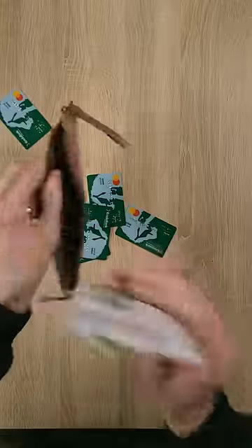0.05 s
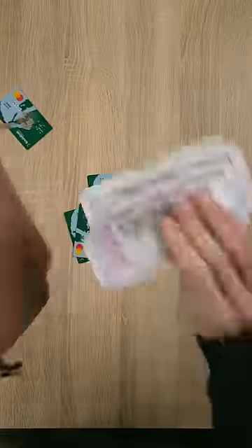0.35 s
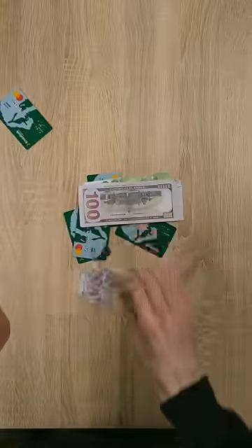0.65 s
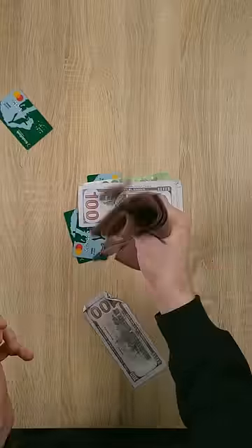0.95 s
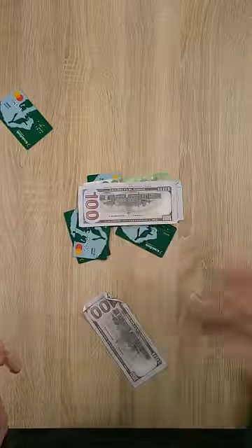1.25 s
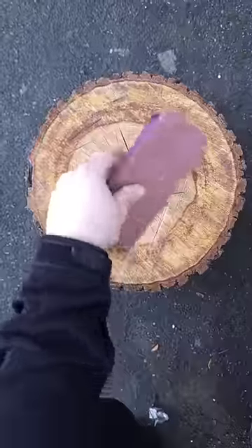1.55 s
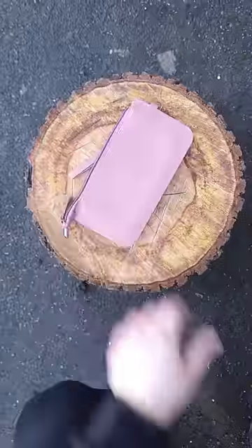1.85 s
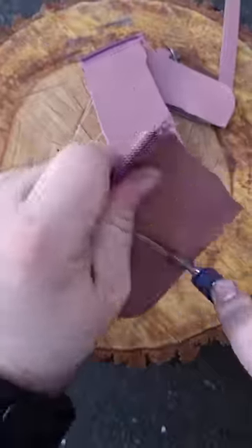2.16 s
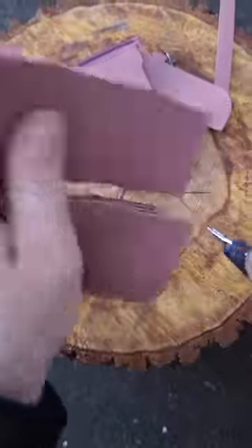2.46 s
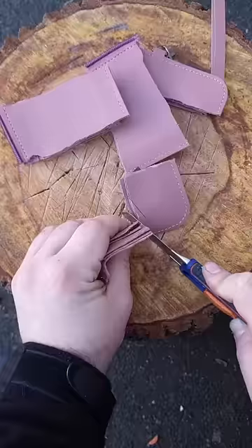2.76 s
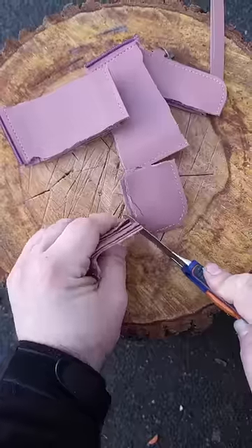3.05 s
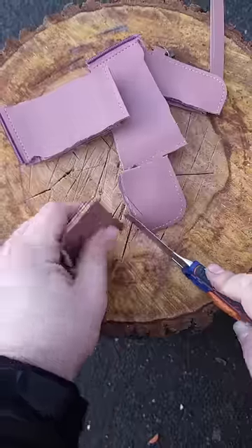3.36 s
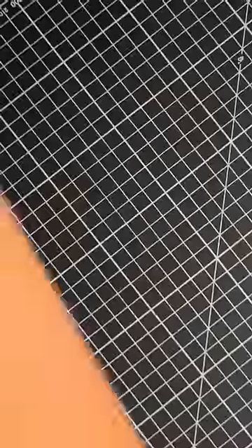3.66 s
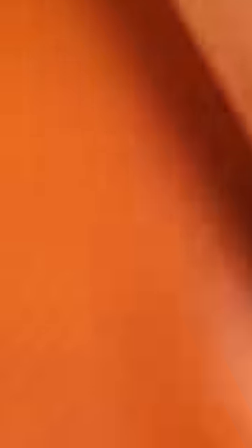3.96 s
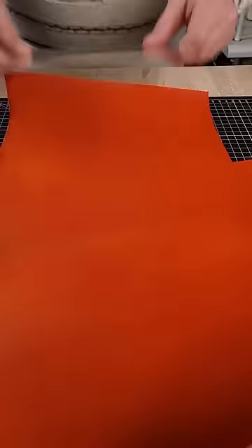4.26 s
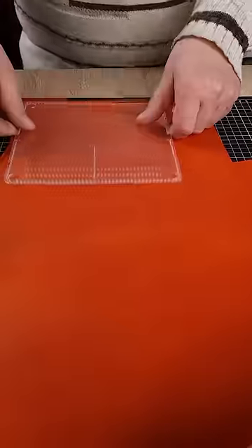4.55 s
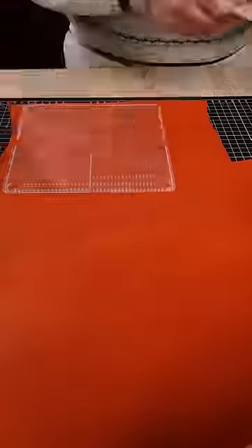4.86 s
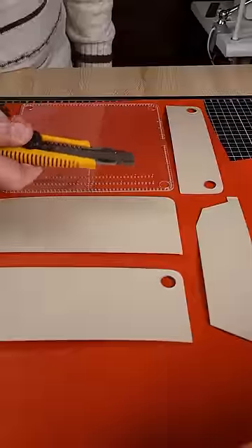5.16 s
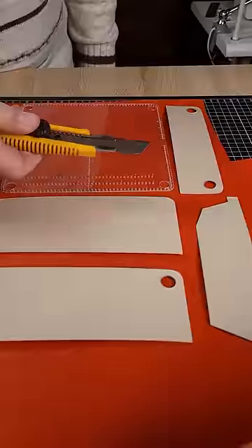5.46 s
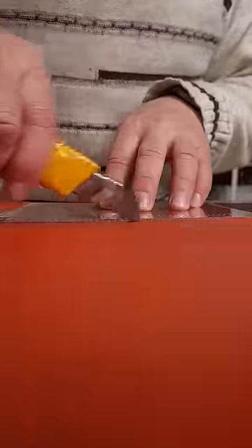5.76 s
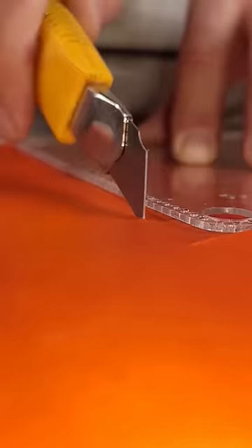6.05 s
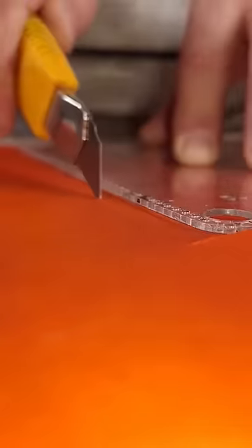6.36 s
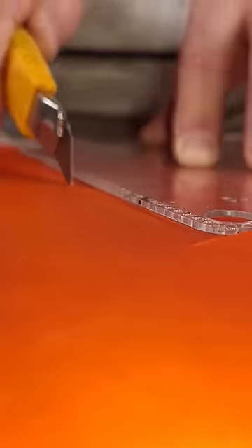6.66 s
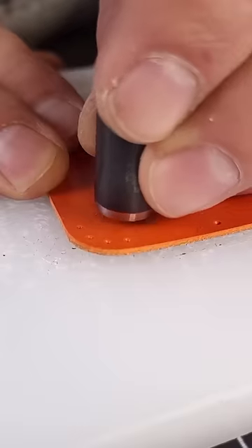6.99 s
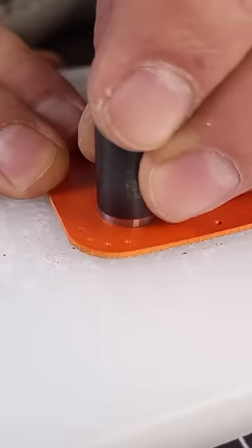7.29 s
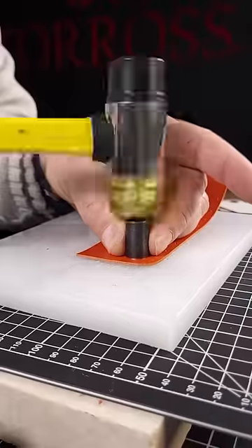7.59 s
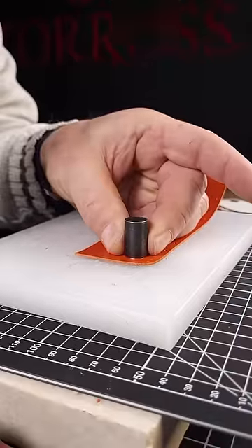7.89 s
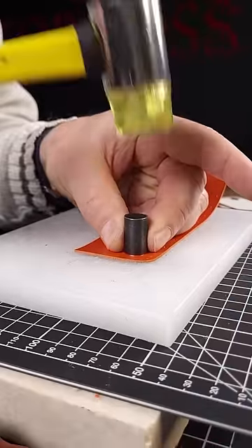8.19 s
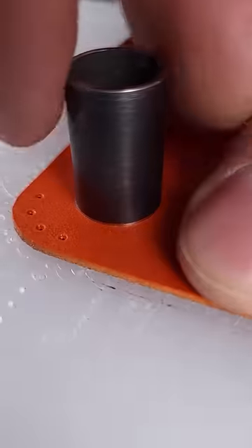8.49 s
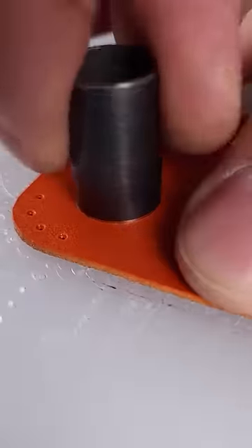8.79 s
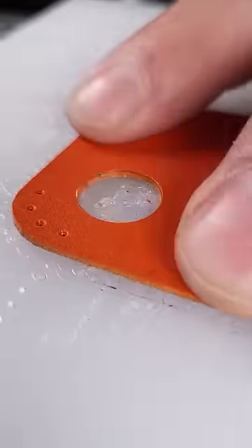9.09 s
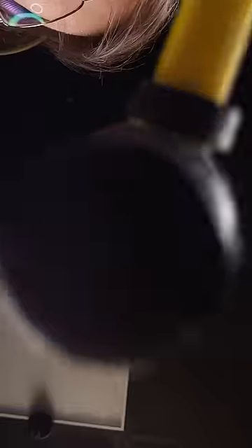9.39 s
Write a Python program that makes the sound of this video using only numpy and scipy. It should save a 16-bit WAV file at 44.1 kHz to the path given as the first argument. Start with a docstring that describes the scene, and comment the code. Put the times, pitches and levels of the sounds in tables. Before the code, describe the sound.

Money lands on a table, then leather is snipped, flopped open, sliced with a utility knife and punched with two loud, booming mallet blows.

```python
"""Leather work in quick shots, each place with its own background. A wallet is emptied on a table.
Outdoors, scissors shear a leather patch on a stump. In the shop a hide swishes and slaps open,
a plastic template lands on it, and a snap-off knife ratchets out and slices along the template.
A mallet drives a hole punch twice, booming through bench and room and overloading the microphone.
The punch is worked loose; a dry knock close by ends the scene."""
import sys
import numpy as np
from scipy import signal
from scipy.io import wavfile
from scipy.ndimage import uniform_filter1d

SR = 44100
rng = np.random.default_rng(int(sys.argv[2]) if len(sys.argv) > 2 else 0)


def materialize(psi):
    """Save the field psi as 16-bit PCM at rate SR to the path in sys.argv[1].

    A 1-D psi becomes a single channel; in a 2-D psi each row is a channel.
    """
    bounded = np.clip(np.atleast_2d(psi).T, -1, 1)
    quanta = np.round(bounded * 32767).astype(np.int16)
    wavfile.write(sys.argv[1], SR, quanta)


N = 424683
TIME = np.arange(N) / SR
SWING_START_S = 3.465

# flexing hide: freq_hz, level_db
LEATHER_SPECTRUM = [(60, -22), (200, -11.5), (420, -8), (1400, -6), (3100, -9.5), (4300, -16.5),
                    (10000, -26.5), (16000, -37)]
# workshop reverberation: freq_hz, t60_s
SHOP_DECAY = [(60, 0.49), (200, 0.3), (700, 0.1), (7000, 0.3), (15000, 0.21)]


def amp(db):
    """Decibels to gain."""
    return 10 ** (np.asarray(db) / 20)


def read(points, hz):
    """Interpolates a table along log frequency."""
    freq_hz, value = np.transpose(points)
    return np.interp(np.log(hz + 1), np.log(freq_hz + 1), value)


def add(mix, start_s, sound):
    """Mixes a sound in at start_s."""
    part = mix[:, round(start_s * SR):][:, :sound.shape[-1]]
    part += sound[..., :part.shape[1]]


def spread(mid, side, width=.3, pan_db=0):
    """Left and right from a shared and an unshared part."""
    return np.array([mid + width * side, mid - width * side]) * amp([[pan_db / 2], [-pan_db / 2]])


def centre_bass(x, below_hz):
    """Long waves reach both microphones almost alike; short ones differ."""
    side = (x[0] - x[1]) / 2
    treble = signal.lfilter(*signal.butter(1, below_hz, "high", fs=SR), side)
    return spread(x.mean(0), .25 * side + .75 * treble, width=1)


def body(spectrum, modes=(), tilt_db_oct=0, ripple_db=0):
    """Unit-energy response: a tilted spectrum, strong resonances and a ripple of many weak ones."""
    hz = abs(np.fft.fftfreq(4096, 1 / SR))
    db = read(spectrum, hz) + tilt_db_oct * np.log2(np.maximum(hz, 250) / 1000)
    weak_hz = np.arange(0, SR, 70)
    db += ripple_db * np.interp(hz, weak_hz, rng.uniform(-1.02, 1, len(weak_hz)))
    for centre_hz, width_hz, lift_db in modes:
        db += lift_db * np.exp2(-(2 * (hz - centre_hz) / width_hz) ** 2)
    minimum_phase = np.exp(np.conj(signal.hilbert(np.log(amp(db)))))
    response = np.fft.ifft(minimum_phase).real[:len(hz) // 2]
    return response / np.linalg.norm(response)


def level(curve):
    """Smoothed gain along (time_s, level_db) points, silent outside them."""
    time_s, db = np.transpose(curve)
    inside = (TIME >= time_s[0]) & (TIME <= time_s[-1])
    return uniform_filter1d(amp(np.interp(TIME, time_s, db)) * inside, size=128)


def swell(start_s, length_s, level_db):
    """Level curve of one stroke: rise, hold, fade."""
    shape = [(-1 / 4, -24), (1 / 5, -2), (2 / 3, 0), (5 / 4, -24)]
    return [(start_s + share * length_s, level_db + dip_db) for share, dip_db in shape]


def rush(curve, spectrum, modes=(), grain_db=0, grain_s=.0048, width=.1, pan_db=0, ripple_db=0):
    """Countless tiny impulses ring a body, in clumps when surfaces stick and slip."""
    gain = level(curve)
    live = np.flatnonzero(gain > 1e-9)
    white = rng.standard_normal((2, len(live)))
    knots_s = np.arange(0, 10, grain_s)
    grip = np.clip(rng.standard_normal(20000)[:len(knots_s)], -2, 2)
    clumps = amp(grain_db * np.interp(TIME[live], knots_s, grip))
    clumps /= np.sqrt(np.mean(clumps ** 2) + 1e-20)
    response = body(spectrum, modes, ripple_db=ripple_db)
    sound = signal.oaconvolve(white * clumps, response[None], axes=1)[:, :len(live)]
    out = np.zeros((2, N))
    out[:, live] = spread(*sound, width, pan_db) * gain[live]
    return out


def hits(rows, spectrum, modes=(), rise_s=.0004, width=.13, pan_db=0, wander=.041, lead_in=0):
    """Each contact is a fast-dying chatter ringing a body whose resonances shift with the grip."""
    lead_in_s = .004  # a faint swell of noise leads into the click, softening its onset
    t = TIME[:SR // 4] - 2 * lead_in_s
    after_s = np.maximum(t, 0)
    out = np.zeros((2, N))
    for start_s, db, t60_s, tilt_db_oct in rows:
        shift = 1 + wander * rng.uniform(-1.1, 1)
        shifted = [(hz * shift, width_hz, lift_db) for hz, width_hz, lift_db in modes]
        response = body(spectrum, shifted, tilt_db_oct)
        envelope = amp(-60 * after_s / t60_s) * (1 - np.exp(-after_s / rise_s))
        envelope += lead_in * np.exp(-abs(t) / lead_in_s)
        burst = rng.standard_normal((2, len(t))) * envelope
        chatter = signal.fftconvolve(burst, response[None], axes=1)
        chatter *= np.linalg.norm(envelope) / np.linalg.norm(chatter, axis=1, keepdims=True)
        add(out, start_s + t[0], amp(db) * spread(*chatter, width, pan_db))
    return out


def alike(rows, t60_s, tilt_db_oct=0, gain_db=0):
    """Gives contacts of one kind a common decay, tilt and gain."""
    return [(start_s, db + gain_db, t60_s, tilt_db_oct) for start_s, db in rows]


def ringing(modes, rise_s, scatter=1):
    """Dying modes build up as a blow spreads; scatter=0 starts them in phase."""
    t = TIME[:SR]
    waves = sum(amp(db - 60 * t / t60_s) * np.sin(2 * np.pi * (hz * t + scatter * rng.random()))
                for hz, db, t60_s in modes)
    return waves * (1 - np.exp(-t / rise_s))


def tail(decay):
    """Two unrelated wakes of dense reflections, each band dying at its own rate."""
    hz, t, bands = signal.stft(rng.standard_normal((2, SR * 3 // 4)), SR, nperseg=256)
    return signal.istft(bands * amp(-60 * t / read(decay, hz)[:, None]), SR, nperseg=256)[1]


def room(x, decay, wet_db, width=.13):
    """Adds the reflections of the surroundings."""
    response = spread(*tail(decay), width)
    response /= np.linalg.norm(response[0])
    return x + amp(wet_db) * signal.oaconvolve(x.mean(0)[None], response, axes=1)[:, :N]


def backgrounds():
    """Room air and mains hum indoors, a low rumble in the yard."""
    # air of each place: freq_hz, level_db
    table_air = [(100, -5.5), (300, -14), (580, -7.5), (1300, -27), (4000, -28.5), (7000, -26),
                 (15000, -29.5)]
    yard_air = [(25, -15.5), (75, 1.5), (202, -5), (293, -2.5), (790, -16), (4380, -31.5), (15000, -47)]
    shop_air = [(30, 0), (122, -16), (154, -9.5), (472, -4.5), (552, -12), (716, -4.5), (1140, -17),
                (15000, -43)]
    # its level curves: time_s, level_db
    table_curve = [(0, -58.5), (.8, -67), (1.38, -64)]
    yard_curve = [(1.38, -51), (1.85, -45), (2.0, -39), (2.75, -40.5), (2.8, -43), (3.48, -45)]
    shop_curves = [
        [(4.09, -56), (4.95, -63), (5.45, -76.5)],
        [(6.68, -61), (7.36, -60)],
        [(8.19, -57), (9.3, -57), (9.32, -81.5), (9.63, -74)],
    ]
    # mains: start_s, end_s, pitch_hz, level_db
    hums = [(0, 1.347, 99, -64), (4.097, 5.24, 119.3, -69), (6.69, 9.32, 118.6, -66)]
    yard = rush(yard_curve, yard_air, grain_db=2, grain_s=.063, width=1, pan_db=-1)
    out = rush(table_curve, table_air, width=.63) + centre_bass(yard, below_hz=760)
    for curve in shop_curves:
        out += rush(curve, shop_air, modes=[(700, 200, 4.6), (1342, 190, 5.3), (6700, 410, 8)], width=.2)
    for start_s, end_s, hz, db in hums:
        phase = 2 * np.pi * hz * TIME
        hum = np.sqrt(2) * (np.sin(phase) + amp(-8) * np.sin(2 * phase))
        out += level([(start_s, db), (end_s, db)]) * hum
    return out


def brushes(rows, grain_db, width):
    """Brief friction over paper or leather."""
    # brushed paper: freq_hz, level_db
    spectrum = [(200, 2.5), (900, -5.5), (1900, 2), (3600, -2.5), (7000, -3), (10000, -13.5),
                (16000, -13.5)]
    return sum(rush(swell(*row), spectrum, grain_db=grain_db, width=width) for row in rows)


def wallet():
    """Banknotes rustle and land among cards; each slap leaves a short wash in the bare room."""
    # paper on palms: start_s, length_s, level_db
    rustles = [(0, 0.42, -62), (.88, 0.1, -59), (1.02, 0.097, -55), (1.172, 0.025, -60)]
    # cards and money landing: start_s, level_db, t60_s, tilt_db_oct
    drops = [(0.176, -34.5, 0.012, 2), (0.403, -12, 0.026, 0.5), (.884, -24, 0.015, 2.5),
             (1.006, -40.5, 0.014, 1)]
    # slap on the table: freq_hz, level_db
    spectrum = [(60, -17.5), (408, -5), (767, -13), (1200, -14.5), (1820, -4.5), (3420, -3.5), (16000, -23)]
    reflections = [(start_s, db - 17.5, .3, tilt - 1.5) for start_s, db, _, tilt in drops]
    wash = hits(reflections, spectrum, rise_s=.0023, width=.89)
    slaps = hits(drops, spectrum, rise_s=.0024, width=.6)
    return centre_bass(slaps + wash + brushes(rustles, grain_db=3, width=.95), below_hz=400)


def scissors():
    """A leather patch lands on the stump; blades shear its fibres, snap through and tick when moved."""
    # patch: start_s, level_db, t60_s, tilt_db_oct
    landing = [(1.6455, -21.5, 0.034, -1.5)]
    # blade snaps and ticks: start_s, level_db
    snaps = [(1.44, -53), (2.25, -13), (2.3019, -26), (2.317, -25.5), (2.3345, -17.5), (2.3638, -21),
             (2.3807, -15.5), (2.779, -40), (2.878, -38), (2.984, -34.5), (3.072, -21), (3.3802, -20),
             (3.392, -20), (3.4682, -31.5)]
    # blades shearing: start_s, length_s, level_db
    closings = [(2.201, 0.034, -33), (2.426, 0.022, -33.5), (3.056, .018, -36.5), (3.289, .07, -46)]
    # snip: freq_hz, level_db
    spectrum = [(150, -13), (1300, -9.5), (2000, -4.5), (4800, -3), (7500, -2.5), (9000, -10.5),
                (16000, -13.5)]
    # blade resonances: centre_hz, width_hz, lift_db
    modes = [(2025, 300, 9), (2950, 490, 6.5), (4530, 370, 4.5)]
    snips = hits(alike(snaps, t60_s=.023), spectrum, modes, width=.8, pan_db=-5, wander=.13)
    shears = sum(rush(swell(*row), spectrum, modes, grain_db=8, grain_s=.0005, width=.8, pan_db=-2.5)
                 for row in closings)
    patch = hits(landing, LEATHER_SPECTRUM, rise_s=.00097, lead_in=.31)
    return room(patch + snips + shears, decay=[(1000, .1)], wet_db=-9.5)


def hollow(time_s):
    """Resonances of the curved hide, rising as it unrolls."""
    # rolled hide: centre_hz, width_hz, lift_db
    modes = [(435, 120, 12), (820, 190, 9), (1590, 300, 5)]
    rise_per_s = .47
    shift = 1 + rise_per_s * max(time_s - SWING_START_S, 0)
    return [(hz * shift, width_hz, lift_db) for hz, width_hz, lift_db in modes]


def hide():
    """Stiff leather swishes, drags, flops and slaps open; hands and template slide over it."""
    # leather dragging on the mat, hands and template sliding: start_s, length_s, level_db
    drags = [(3.525, 0.068, -23.5), (3.878, .04, -19.5), (4.106, .05, -41.5), (4.316, .04, -41),
             (4.756, .03, -42.5)]
    slides = [(1.93, 0.13, -49), (4.1, 0.065, -44), (4.22, 0.38, -59), (4.39, 0.061, -51.5),
              (4.635, 0.04, -47)]
    # leather flopping over, pulling taut or slapping down: start_s, level_db
    flops = [(1.592, -36.5), (3.718, -19.5), (4.303, -26)]
    slaps = [(3.730, -8), (3.751, -9.5), (3.764, -12), (3.814, -14.5)]
    # slack leather's dull spectrum: freq_hz, level_db
    slack = [(100, -7), (1700, -6.5), (3600, -23), (16000, -44)]
    swing_s = SWING_START_S + np.cumsum([0, .04, .43, .165])  # rise, hold, fall
    swing = list(zip(swing_s, [-60.5, -34.5, -34.5, -60.5]))
    swish = rush(swing, LEATHER_SPECTRUM, hollow(swing_s.mean()), grain_db=3, grain_s=.01, width=.03)
    dragging = sum(rush(swell(*row), slack, hollow(row[0]), grain_db=2) for row in drags)
    flopping = sum(hits([row], slack, hollow(row[0])) for row in alike(flops, t60_s=.048))
    slapping = sum(hits([row], LEATHER_SPECTRUM, hollow(row[0]), rise_s=.0008, width=.03)
                   for row in alike(slaps, t60_s=.042, tilt_db_oct=-1.13))
    sliding = brushes(slides, grain_db=6.5, width=.1)
    return swish + dragging + sliding + room(flopping + slapping, SHOP_DECAY, wet_db=-10.5, width=.05)


def template():
    """The plastic template lands on the hide, each edge with a click and a thud."""
    # edges: start_s, level_db
    landings = [(4.666, -20.5), (4.687, -24), (4.75, -35)]
    clicks = alike(landings, t60_s=.036, tilt_db_oct=6)
    thuds = alike(landings, t60_s=.13, tilt_db_oct=-6.5, gain_db=-12)
    contacts = hits(clicks + thuds, LEATHER_SPECTRUM, rise_s=.001, width=.061, lead_in=.17)
    return room(contacts, SHOP_DECAY, wet_db=-15.5)


def knife_ratchet():
    """The slider scrapes along its channel and slows, clicking at every detent."""
    # clicks: start_s, level_db
    detents = [(4.977, -9.5), (4.985, -14.5), (4.997, -17), (5.009, -12), (5.024, -11.5), (5.034, -12.5),
               (5.054, -9), (5.0736, -11), (5.1025, -12), (5.1364, -13.5), (5.191, -12)]
    # slider: freq_hz, level_db
    spectrum = [(60, -12), (749, -20), (2000, -4.5), (3580, -4), (6580, 1.5), (7940, -2.5), (14600, -4),
                (16000, -30)]
    clicks = hits(alike(detents, t60_s=.019), spectrum, modes=[(3170, 630, 7.4)],
                  rise_s=.00071, width=.087, lead_in=.13)
    scrape = rush(swell(4.976, .058, -27.5), spectrum, modes=[(2406, 1300, 12)], grain_db=7.5, width=.17)
    return room(clicks + scrape, SHOP_DECAY, wet_db=-8)


def knife_cuts():
    """The blade parts fibres in a straight stroke, catching on the template, then in a curved one."""
    # stroke spectra: freq_hz, level_db
    straight = [(700, -13), (1400, -10.5), (2300, -1.5), (4000, -4), (6500, -14), (7500, -6.5),
                (13000, -13.5)]
    curved = [(230, -0.5), (700, 0.5), (1000, -7), (7000, -8), (15500, -16.5)]
    # blade and template resonances: centre_hz, width_hz, lift_db
    entry_modes = [(1020, 170, 9), (2020, 330, 7.8), (3620, 760, 8.3), (4800, 360, 6.9), (5970, 1700, 13.6)]
    draw_modes = [(1005, 220, 13), (1870, 410, 10), (2840, 520, 10), (3590, 250, 5.9), (5550, 1720, 12.7),
                  (6440, 670, 14)]
    corner_modes = [(1610, 380, 11.4), (3600, 730, 12), (5030, 850, 9.3), (9120, 2400, 14)]
    # stroke levels: time_s, level_db
    entry_curve = [(5.453, -34), (5.64, -36), (5.75, -29.5)]
    draw_curve = [(5.75, -30), (6.0, -33.5), (6.015, -43)]
    corner_curve = [(6.015, -50.5), (6.18, -43.5), (6.32, -48), (6.47, -42.5), (6.56, -51), (6.64, -44),
                    (6.675, -44.5)]
    # blade on the template's edge: start_s, level_db, t60_s, tilt_db_oct
    snag = [(5.746, -9, 0.013, -2)]
    entry = rush(entry_curve, straight, entry_modes, grain_db=2, grain_s=.00096,
                 width=.3, pan_db=-3.5, ripple_db=5)
    draw = rush(draw_curve, straight, draw_modes, grain_db=1.7, grain_s=.0017,
                width=.3, pan_db=-1.5, ripple_db=5)
    corner = rush(corner_curve, curved, corner_modes, grain_db=1, width=.52, pan_db=-4.5, ripple_db=5)
    catch = hits(snag, straight, draw_modes[1:], rise_s=.00044)
    return entry + catch + draw + corner


def mallet():
    """The mallet cracks on the steel punch; bench and room answer each blow with the same boom."""
    # mallet on punch: start_s, gain_db
    blows = [(7.4888, 0), (7.927, 2)]
    # boom: freq_hz, level_db
    spectrum = [(25, -10.5), (110, -9), (190, -3), (680, -5.5), (1300, -12), (1900, -21), (2700, -28.5),
                (10000, -39.5), (16000, -59)]
    # bench and walls: freq_hz, t60_s
    decay = [(30, 0.46), (130, 0.24), (700, 0.36), (2000, 0.32), (8000, 0.33), (15000, 0.29)]
    # bench: pitch_hz, level_db, t60_s
    modes = [(194, -4, .21), (333, -4.5, .32), (376, -12, .33), (443, -9.5, .22), (510, -9, .35),
             (620, -4, .23), (822, -12, .22), (937, -11, .26), (991, -8, .22), (1436, -13.5, .19)]
    out = hits(alike(blows, t60_s=.006, gain_db=-2), spectrum=[(3000, .5), (16000, -19)], rise_s=.000091)
    walls = signal.fftconvolve(tail(decay), body(spectrum)[None], axes=1)
    boom = centre_bass(spread(*walls, width=.47, pan_db=-2.5), below_hz=1100)
    bench = spread(ringing(modes, rise_s=.0023), ringing(modes, rise_s=.0044), width=.25, pan_db=-2.5)
    for start_s, db in blows:
        add(out, start_s, amp(db - 5) * boom)
        add(out, start_s, amp(db - 3.5) * bench)
    return out


def punch_pull():
    """The punch rubs in its hole, is rocked loose and leaves the leather."""
    # rocking and pulling: start_s, level_db, t60_s, tilt_db_oct
    tugs = [(8.291, -29, 0.19, -10), (8.690, -39.5, 0.15, -12), (8.703, -41.5, 0.014, 8),
            (8.764, -15, 0.021, 3), (8.781, -22, 0.014, 3)]
    # tug: freq_hz, level_db
    spectrum = [(50, -38), (200, -10.5), (480, -10), (1200, -22), (7000, -36.5), (16000, -66)]
    # punch in leather: centre_hz, width_hz, lift_db
    modes = [(315, 70, 13), (730, 120, 11), (1950, 500, 8)]
    pulls = hits(tugs, spectrum, modes, rise_s=.00095, width=.049, wander=0, lead_in=.19)
    twist = rush(swell(8.3, .064, -41.5), [(400, 1), (2100, -14.5), (2900, -39)], modes, grain_db=2)
    return twist + room(pulls, SHOP_DECAY, wet_db=-13.5)


def knock():
    """A close, dry tick with a short, deep thud."""
    # tick: start_s, level_db, t60_s, tilt_db_oct
    contact = [(9.6063, 12, 0.0037, -1.3)]
    # thud: pitch_hz, level_db, t60_s
    modes = [(209, -4, 0.026), (637, 2.5, 0.009)]
    spectrum = [(60, -7), (700, 4), (2200, -3.5), (3400, -11.5), (6500, -13), (16000, -46)]
    out = hits(contact, spectrum, rise_s=.000098)
    add(out, contact[0][0], ringing(modes, rise_s=.0008, scatter=0))
    return out


def scene():
    """All shots in a row."""
    return (backgrounds() + wallet() + scissors() + hide() + template()
            + knife_ratchet() + knife_cuts() + mallet() + punch_pull() + knock())


def record(dry):
    """The microphone overloads on the hardest blows; the highest treble is cut off."""
    ceiling, cutoff_hz = .84, 16000
    clipped = dry / (1 + (dry / ceiling) ** 6) ** (1 / 6)
    lowpass = signal.firwin(511, cutoff_hz, window=("kaiser", 9), fs=SR)
    return signal.oaconvolve(clipped, lowpass[None], "same")


dry = scene()
out = record(dry)
materialize(out)
```